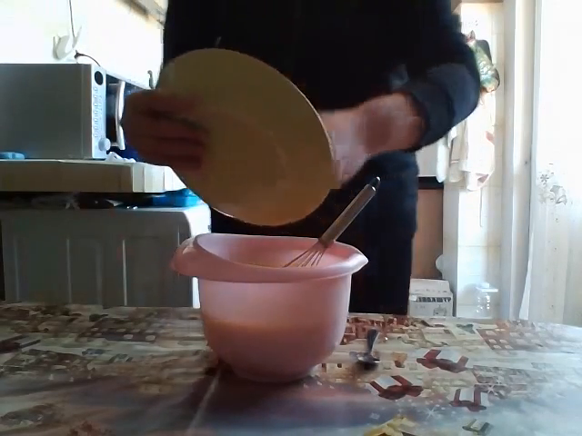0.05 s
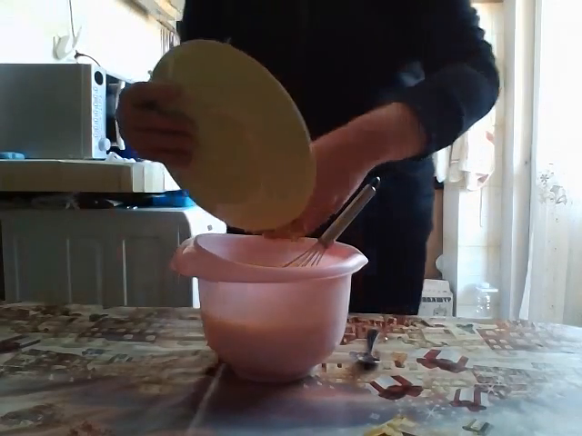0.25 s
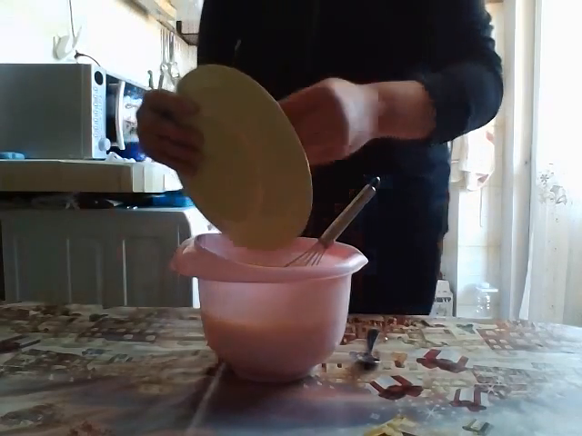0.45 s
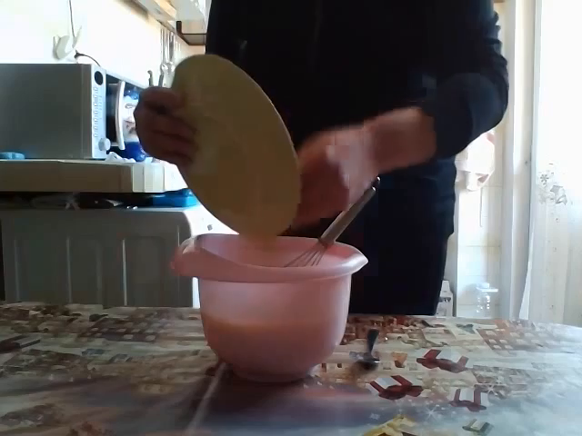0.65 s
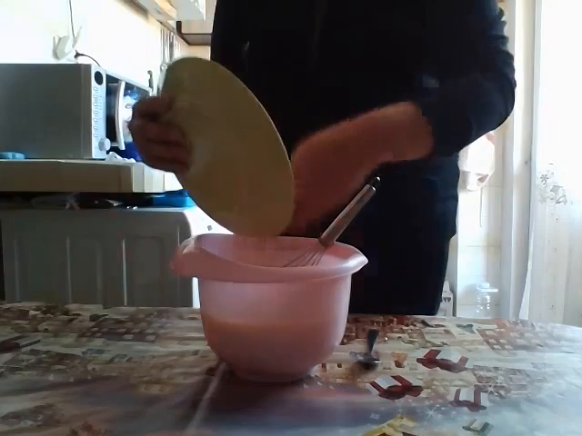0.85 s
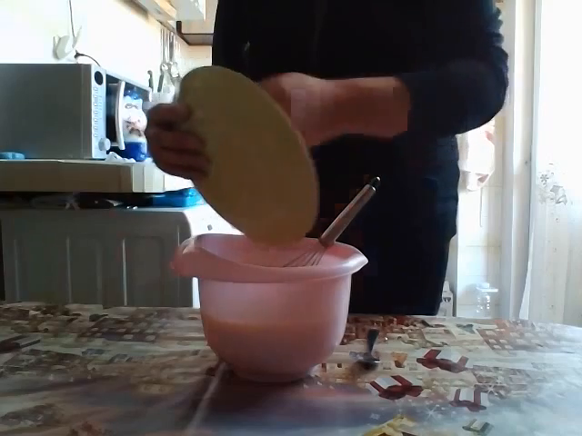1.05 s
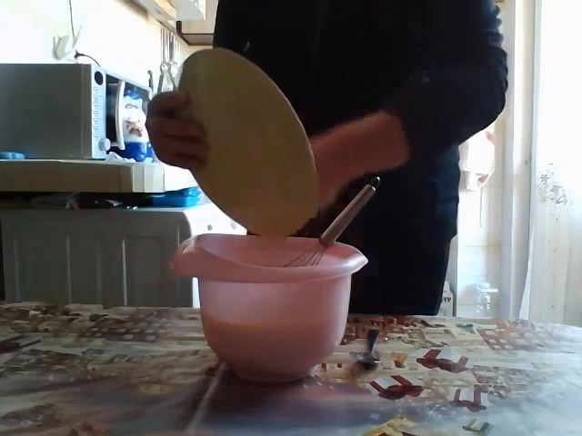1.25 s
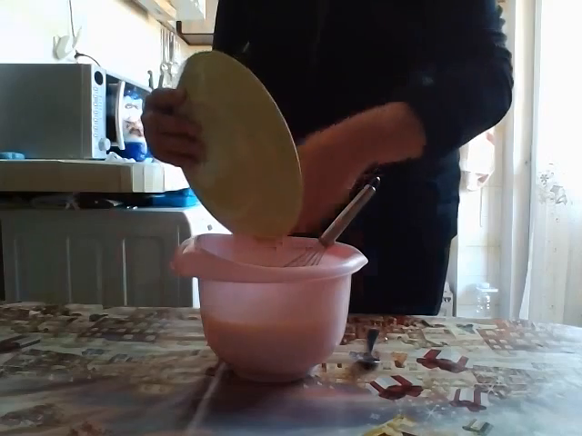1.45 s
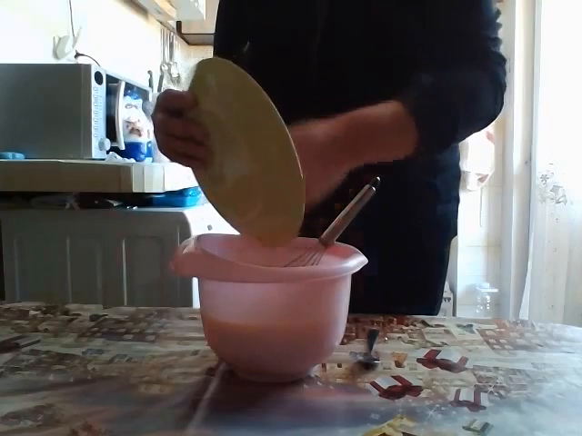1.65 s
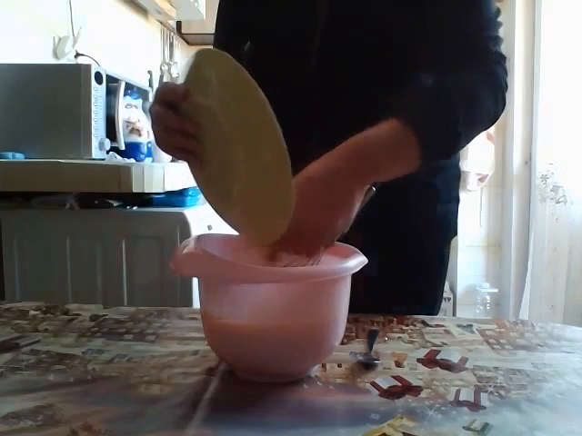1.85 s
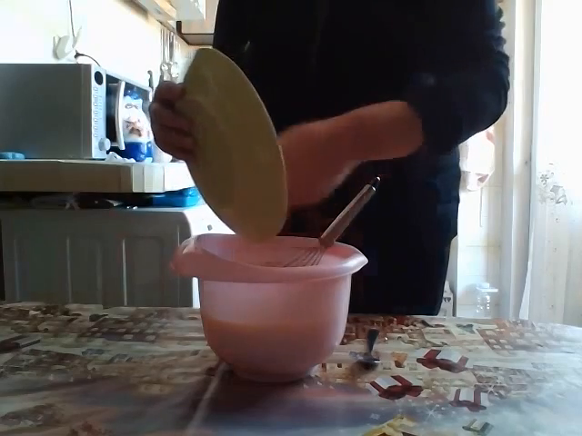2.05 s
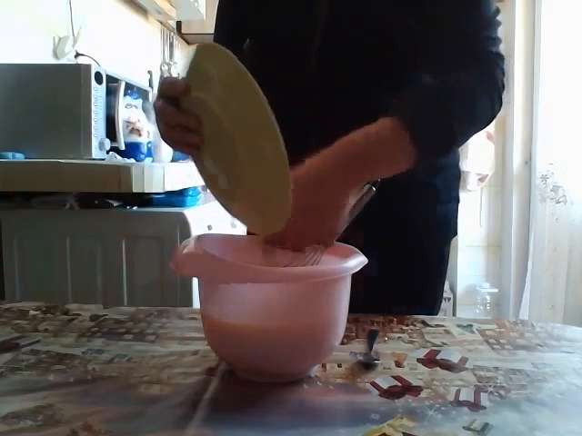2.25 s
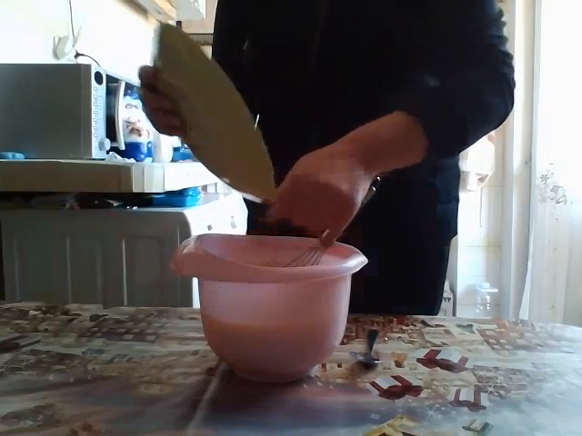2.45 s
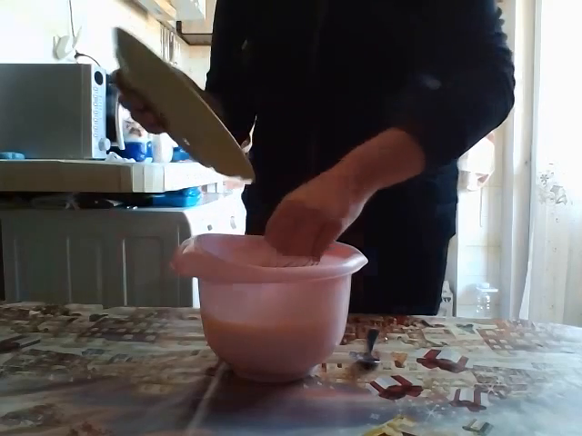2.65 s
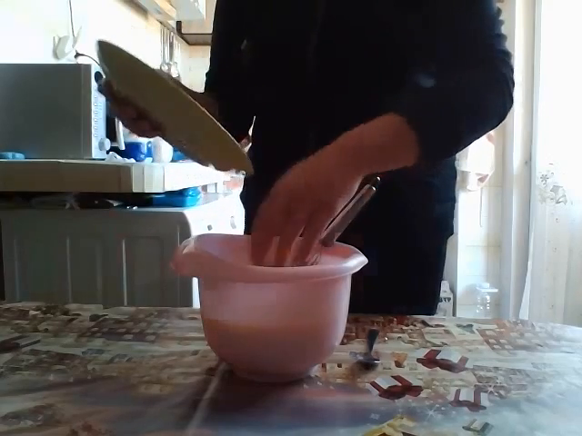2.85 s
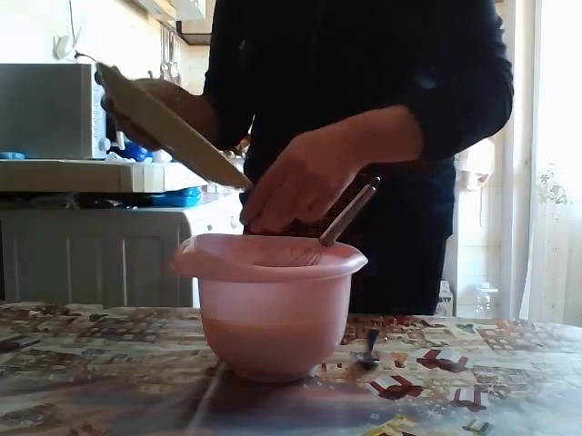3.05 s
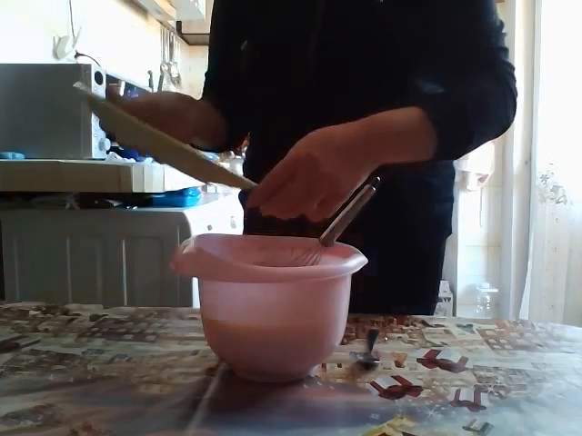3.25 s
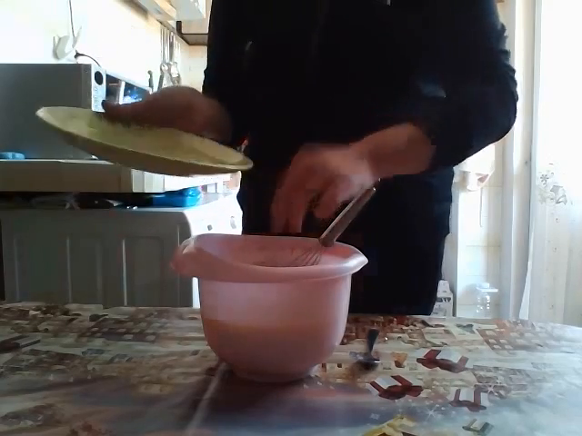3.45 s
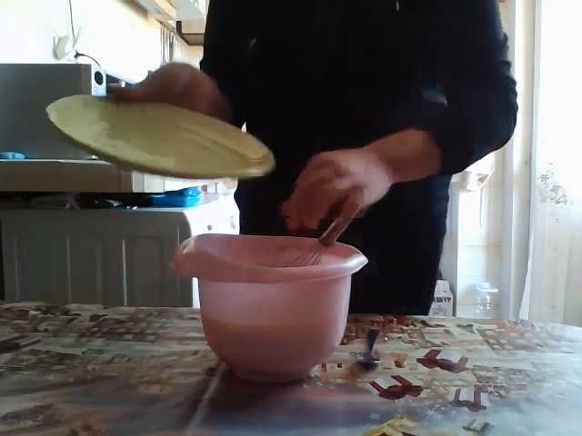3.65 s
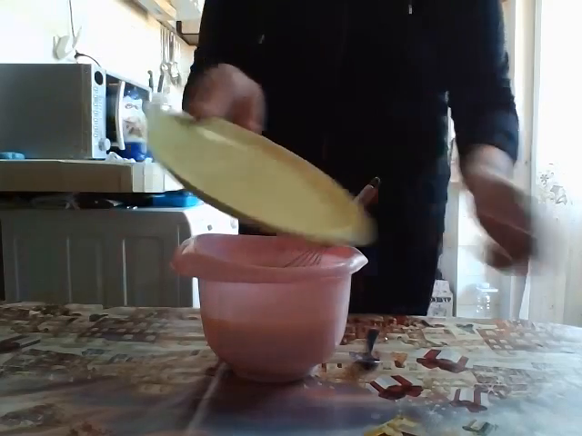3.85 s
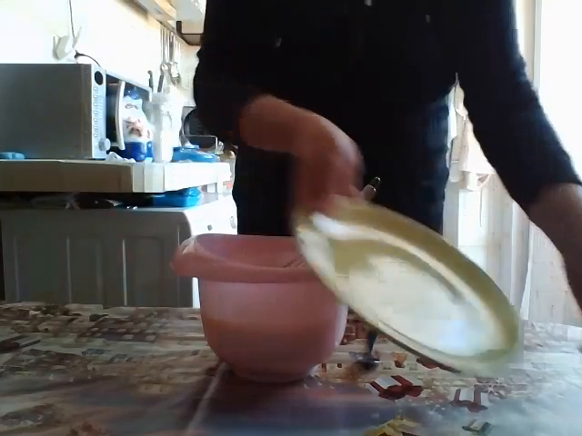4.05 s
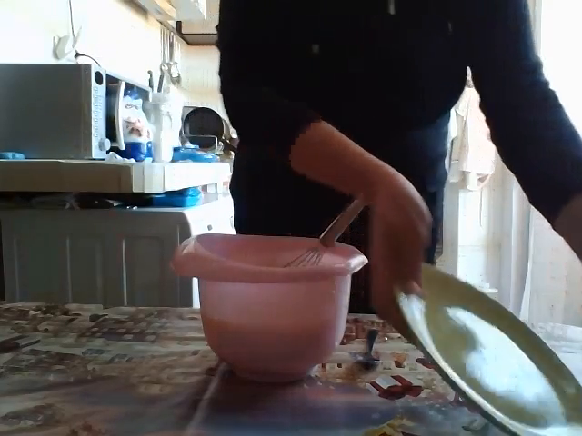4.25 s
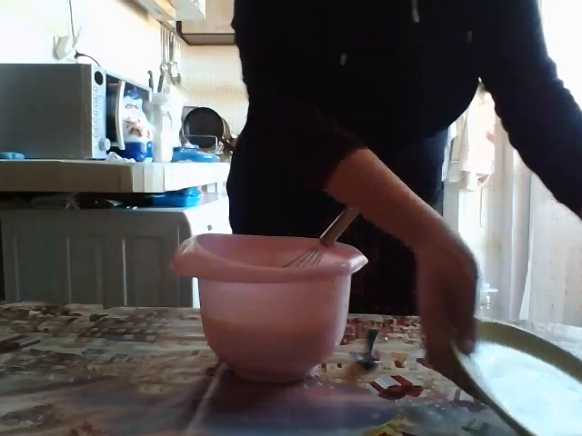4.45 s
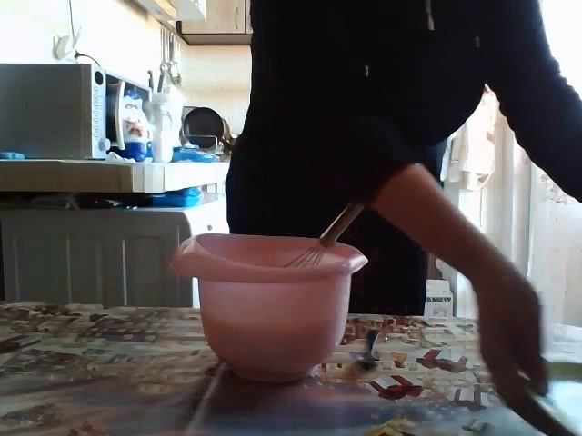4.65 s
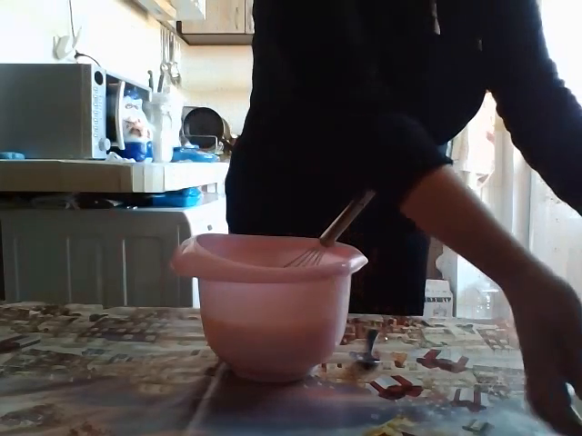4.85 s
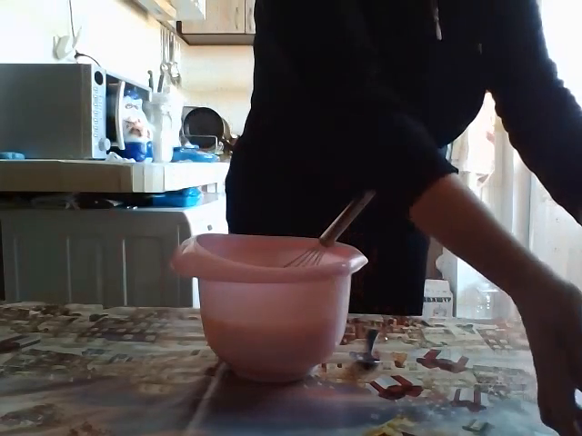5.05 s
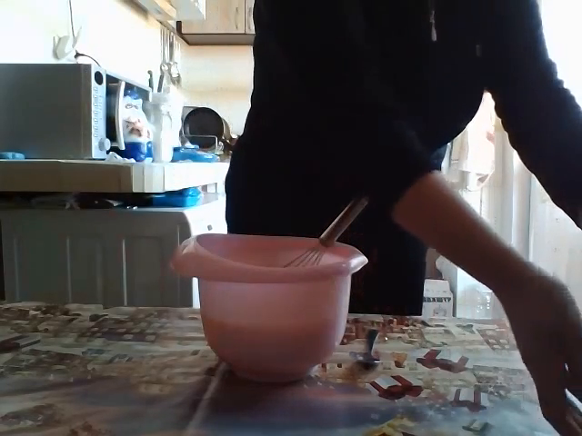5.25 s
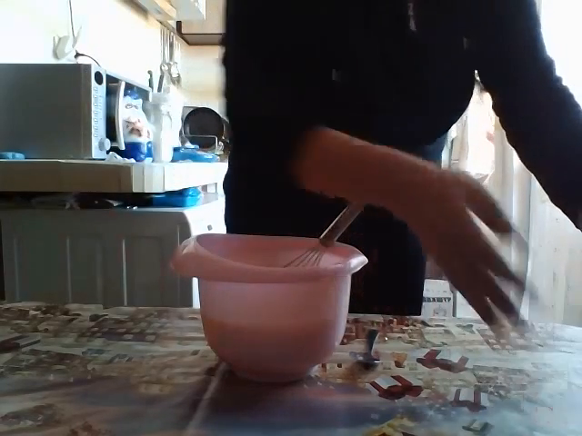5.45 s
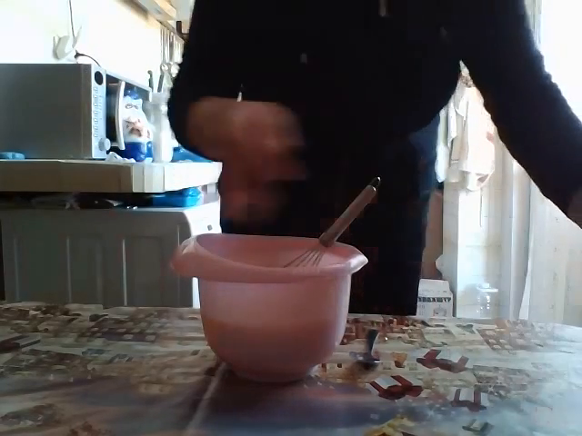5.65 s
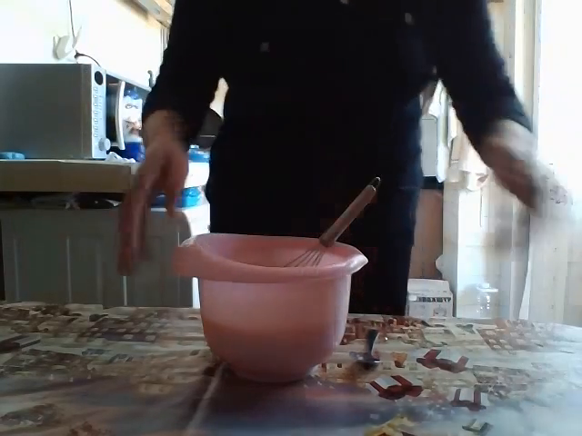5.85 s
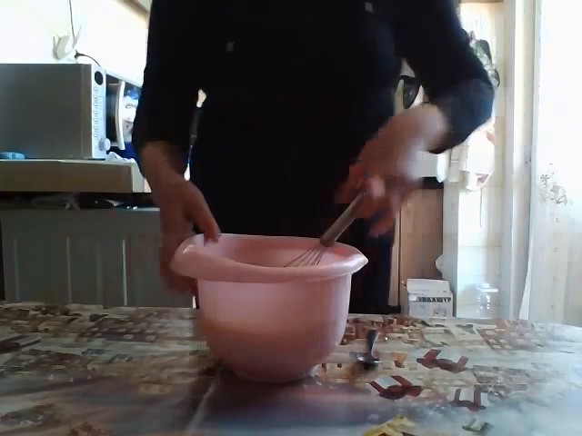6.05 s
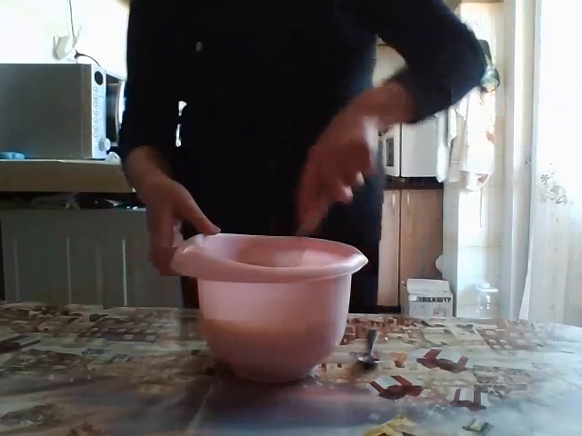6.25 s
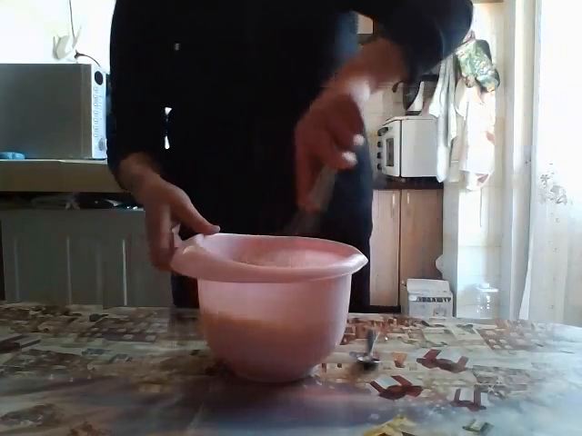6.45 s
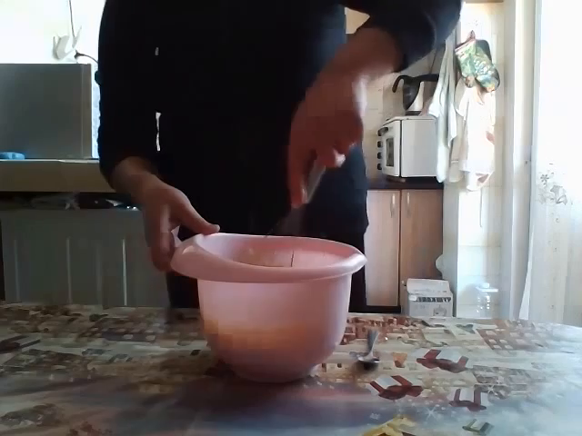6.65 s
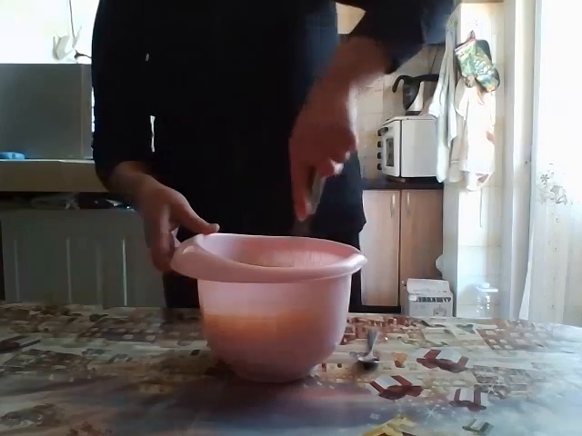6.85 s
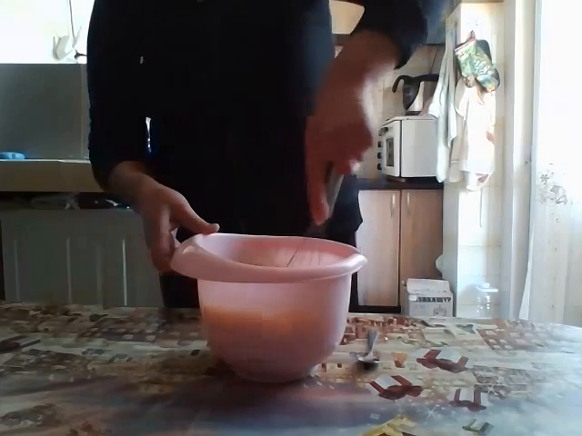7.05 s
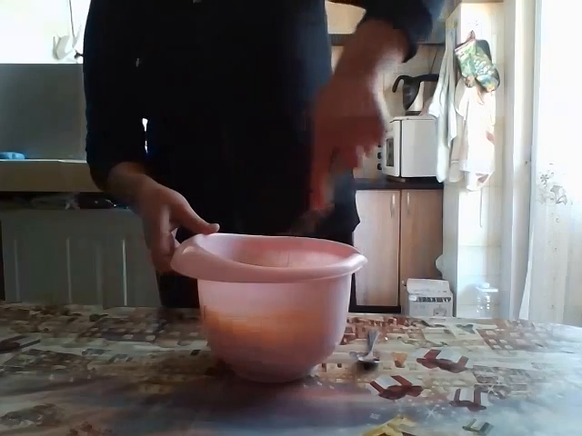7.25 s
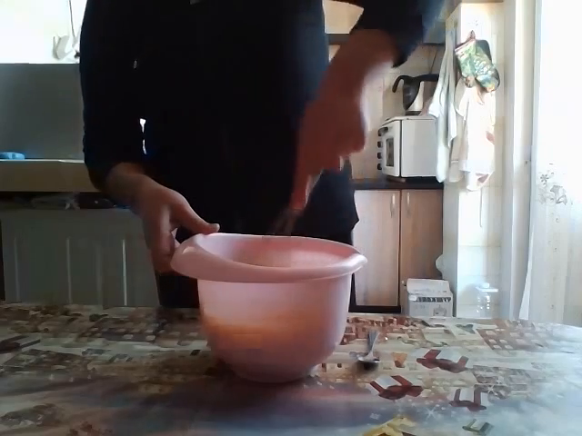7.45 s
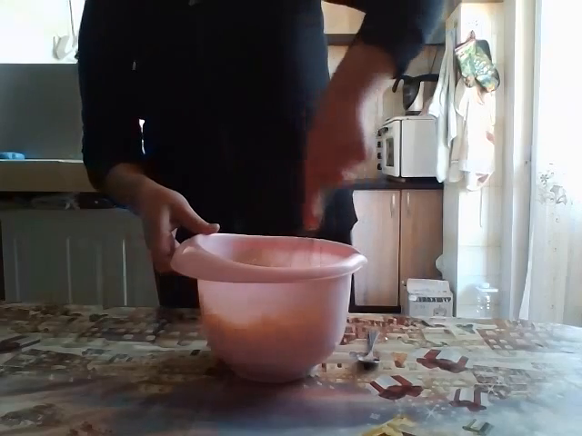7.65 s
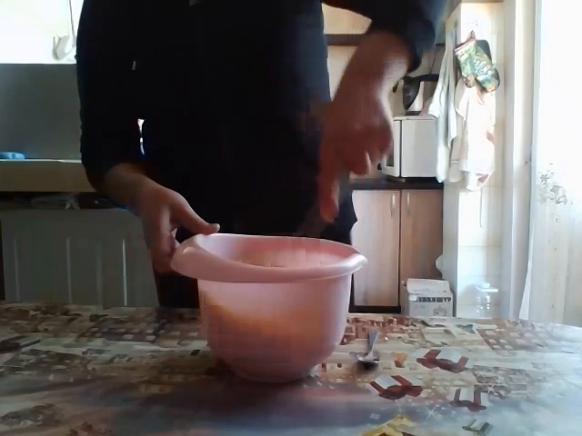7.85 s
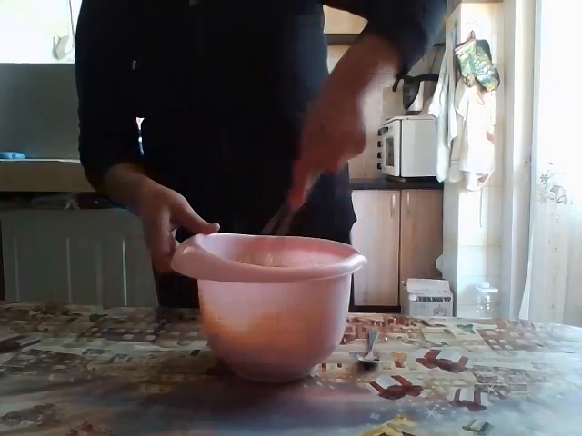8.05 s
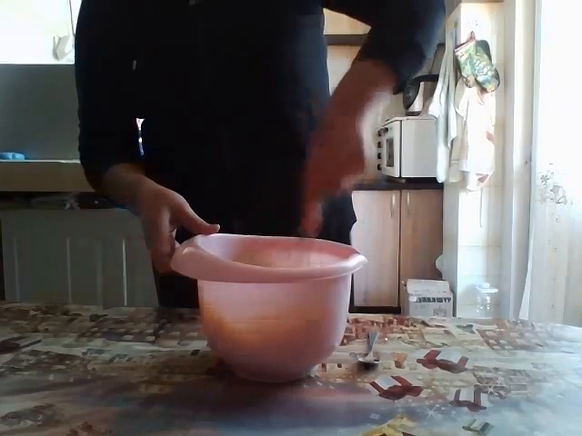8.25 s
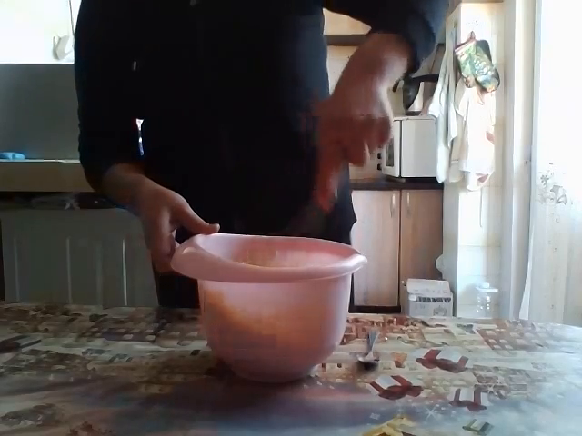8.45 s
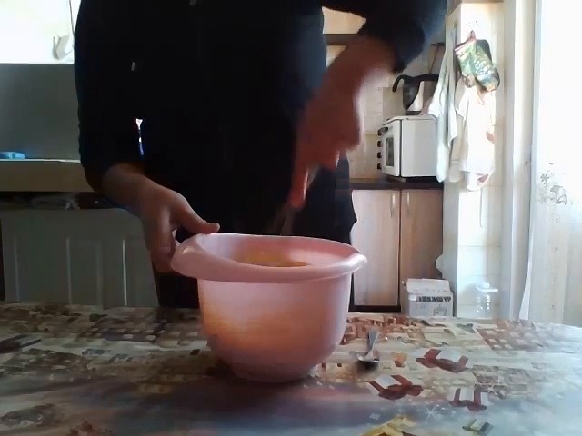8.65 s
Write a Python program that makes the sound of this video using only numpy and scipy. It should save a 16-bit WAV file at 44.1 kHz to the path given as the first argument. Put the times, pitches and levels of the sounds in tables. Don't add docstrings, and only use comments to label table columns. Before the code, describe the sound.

Faint taps on a held china plate, then the plate clatters down on a wooden table, and a whisk scrapes and knocks a plastic bowl.

```python
import sys
import numpy as np
from scipy import signal
from scipy.fft import rfft, irfft, next_fast_len
from scipy.io import wavfile
from scipy.ndimage import uniform_filter1d, minimum_filter1d

SR = 44100
rng = np.random.default_rng(int(sys.argv[2]) if len(sys.argv) > 2 else 0)


def amp(db):
    return 10 ** (np.asarray(db, float) / 20)


def write(x):
    x = np.atleast_2d(x).T
    wavfile.write(sys.argv[1], SR, np.round(np.clip(x, -1, 1) * 32767).astype(np.int16))


N = 384111

# [t/s, peak level/dB, low level/dB, high level/dB, ring f/Hz]
LANDINGS = [(4.362, -5, -8, -19, 1128), (4.378, -15, 0, -17, 339), (4.40, -12.5, -4.5, -23.5, 1300),
            (4.43, -17.5, -3.5, -32.5, 1369), (5.136, -21, 9, -42.5, 758), (5.145, -7, -3.5, -38, 980),
            (5.162, -17, 5, -15, 1062), (5.18, -21, 5.5, -23.5, 502.2), (5.233, 0, -7, -21.5, 720),
            (5.275, -19.5, 5, -29, 1042), (5.431, -8.5, -1.5, -34, 980.4), (5.452, -19.5, 4, -21.5, 601.7),
            (5.495, -28, 3.5, -25, 1042)]
# [t/s, level/dB, weight on the table/dB]
SLIDE = [
    (4.45, -35.5, -10),
    (4.516, -41, 8.5),
    (4.564, -43.5, 19),
    (4.664, -43, 16),
    (4.942, -53.5, 4),
    (5.076, -60.5, 9),
    (5.12, -61, 7),
]
# [f/Hz, width/Hz, level/dB]
WOOD_AND_PLATE = [(491, 81, -2.5), (704, 73, -0.5), (796, 180, -2), (1066, 65, 0), (1115, 40, -0.5),
                  (1410, 210, -7.5), (1690, 180, -9.5), (1953, 220, -16.5)]
# [f/Hz, level per Hz/dB]
CRACK = [(1300, -35.5), (2000, 1.5), (2400, -7.5), (3000, -11), (4000, -21.5), (5500, -29), (7000, -37),
         (9000, -58), (13000, -99)]


def plate_on_table():
    landing = blows([(*row, 0.2223) for row in LANDINGS], body_db=-6, ring_db=-10.0, tail_db=-3.5, snap_s=0.0396)
    db, weight_db = curves(SLIDE)
    bright_db = -17.5 - 0.6 * np.maximum(db + 42.0, -15)
    slide = drag(db, weight_db, bright_db, slips=950, spread_db=0.5, press_db=0.5)
    return sounded(landing + slide, WOOD_AND_PLATE, CRACK)


# [t/s, peak level/dB, low level/dB, high level/dB, ring f/Hz]
TAPS = [(0.108, -67.5, 19, 9.5, 940), (0.143, -53, -5, -7, 1706), (0.324, -43.5, -6.5, -22, 1100),
        (0.454, -46, -6, -20.5, 1274), (0.899, -40.5, -32, -7, 1902), (0.912, -31.5, -33.5, -16, 1001),
        (0.961, -44, -25.5, -11, 1100), (0.999, -48.5, -15.5, -26.5, 816), (1.319, -56, -9.5, -13, 1743),
        (2.232, -43, -6, -17.5, 893.4), (2.248, -45, -16.5, -29, 894), (2.369, -44.5, -18, -13, 857),
        (2.507, -44, -8.5, -29, 1263), (2.533, -43.5, -11.5, -31.5, 857), (2.795, -60.5, 15, -14, 1028),
        (2.858, -49.5, -16, -22, 1277), (2.951, -54, 0, -20, 1969), (3.297, -52, 0.5, -18.5, 2197),
        (3.33, -57.5, -7.5, -21, 902), (3.998, -49, 13, -28.5, 761), (4.189, -56, 6, -37.5, 1660)]
# [f/Hz, width/Hz, level/dB]
HELD_PLATE = [(770, 150, -7.5), (980, 150, -2), (1300, 350, -2), (1660, 200, -1), (2023, 116, -4.5)]


def finger_taps():
    taps = blows([(*row, 0.15) for row in TAPS], body_db=-5, ring_db=-2, tail_db=-2.0, snap_s=0.024)
    return sounded(taps, HELD_PLATE, CRACK)


# [f/Hz, level/dB, t60/s]
CHINA = [
    [(760, -3, 0.3), (795, -1, 0.4)],
    [(1710.3, -1.5, 0.21), (1767, -2, 0.243)],
    [(2684, -9.5, 0.13), (2896.6, -2, 0.16), (2949, -7, 0.21)],
    [(3766, 0.5, 0.059), (4369, -0.5, 0.13), (5164, -10, 0.16), (6419, -8, 0.1)],
]
# [t/s, then level/dB of each of the four families]
CLINKS = [(.064, -72, -71, -53.5, -78), (.12, -79, -63, -53.5, -67), (.176, -73.5, -61, -52, -79.5),
          (.469, -67, -63, -58.5, -78), (1.294, -67, -59, -53, -83.5), (2.174, -65, -55, -47.5, -68.5),
          (2.346, -51, -49, -43.5, -51), (3.99, -47.5, -57, -60.5, -81),
          (4.009, -40.5, -48.5, -61.5, -84.5), (4.924, -59, -56, -75, -68),
          (4.949, -59.5, -49.5, -77.5, -73.5), (5.234, -29.5, -7, -26, -40)]


def china_ring():
    out, t = np.zeros(N + SR), np.arange(SR // 2) / SR
    grip = wobble(80)
    drift = np.cumsum(17 * grip) / SR
    for s, *family_db in CLINKS:
        start = round(s * SR)
        life = 0.65 if s < 3 else 1
        for db, modes in zip(family_db, CHINA):
            ring = 0
            for hz, level, t60 in modes:
                waver_db = 2.9 * np.roll(grip, round(9 * hz))[start:][:len(t)]
                bend = np.roll(drift, round(hz))[start:][:len(t)]
                tone = np.sin(2 * np.pi * (hz * t + bend + rng.random()))
                ring = ring + amp(level - 60 * t / (t60 * life) + waver_db) * tone
            out[start:][:len(t)] += amp(db) * ring * (1 - np.exp(-t / 0.00047)) ** 2
    return out[:N]


# [t/s, level/dB, upper mode level/dB]
RUBS = [
    [(1.2, -99.5, -31.5), (1.29, -51.5, -17), (1.35, -95, -30)],
    [(4.45, -80.5, -27.5), (4.56, -66.5, -11), (4.63, -61, -5), (4.78, -65, -9), (4.9, -74.5, -1.5),
     (5.0, -85.5, -10)],
]
# [f/Hz, width/Hz, level/dB]
SONG = [
    [(2874.4, 42, -0.5)],
    [(4360, 70, 0), (4700, 500, -12)],
]


def china_rub():
    rubs = [curves(rows) for rows in RUBS]
    low = sum(amp(db) for db, upper_db in rubs) * rng.standard_normal(N)
    high = sum(amp(db + upper_db) for db, upper_db in rubs) * rng.standard_normal(N)
    return filtered(low, body(SONG[0])) + filtered(high, body(SONG[1]))


# [t/s, peak level/dB, wires level/dB, ring f/Hz]
SHOVES = [(6.036, -48, 5.5, 434), (6.452, -39, -11.5, 784), (6.838, -19.5, -36, 516),
          (6.899, -25.5, -26.5, 536), (7.104, -30, -29.5, 530.6), (7.12, -20.5, -25.5, 427.2),
          (7.144, -19.5, -38.5, 501.7), (7.369, -26.5, -36.5, 779.5), (7.409, -26.5, -28.5, 1175),
          (7.429, -27.5, -38, 713), (8.598, -23.5, -22, 491)]
# [t/s, peak level/dB, wires level/dB, ring f/Hz]
KNOCKS = [(6.154, -40, -26, 1137), (6.344, -27.5, -24.5, 1173), (6.543, -24, -34.5, 521),
          (6.566, -18, -36, 695), (6.868, -20, -27, 796), (7.03, -54, -6, 2500), (7.354, -34.5, -17, 421),
          (7.383, -28, -26, 791.3), (7.648, -37.5, -32, 467), (7.746, -33.5, -14.5, 1126),
          (7.937, -17, -36, 1103), (7.96, -32.5, -19.5, 1162), (8.012, -13, -38, 755.3),
          (8.045, -32.5, -36.5, 770), (8.231, -17, -40, 1064), (8.268, -23, -33.5, 1139),
          (8.292, -17, -32, 455.3), (8.342, -28.5, -29, 773), (8.547, -20, -40.5, 411.5),
          (8.581, -18, -36, 1100)]
# [t/s, peak level/dB, wires level/dB, ring f/Hz]
TICKS = [(6.206, -40.5, 3.5, 3270), (6.248, -45.5, 2, 1100), (6.319, -15, -15, 804.6),
         (6.375, -28, -25.5, 1146), (6.405, -40.5, -3, 1848), (6.488, -48, -8, 3316),
         (7.593, -34, -12, 1150), (7.662, -24.5, -36.5, 465.3), (7.77, -45.5, -17.5, 1115),
         (7.871, -19, -17, 1161), (7.881, -30, -4, 1400), (8.083, -36, -36, 733), (8.125, -39, -25.5, 700),
         (8.162, -22, -15.5, 1107), (8.427, -47, -16.5, 1500), (8.441, -36.5, -16, 1184),
         (8.459, -43.5, -5, 6160), (8.461, -28, -4.5, 1063), (8.625, -22.5, -11, 685)]
# [level into the table/dB, t60/s]
CONTACTS = [
    (1, 0.079),
    (-11, 0.109),
    (-24.5, 0.123),
]
# [f/Hz, width/Hz, level/dB]
BOWL = [(448.4, 82, -6), (747, 65.2, -0.5), (921.7, 45, -3.5), (1100, 94, 0), (1434, 100.3, -2.5),
        (1614, 196, -10), (2054, 322, -16.5)]
# [f/Hz, level per Hz/dB]
WIRES = [(1400, -16), (2300, 4), (2900, -3), (3200, -5.5), (3500, -4.5), (3900, -11.5), (4300, -10),
         (5000, -23), (5500, -17), (5900, -26), (6500, -17.5), (7200, -26), (9500, -35.5), (14000, -85.5)]


def whisk():
    hits = []
    for rows, (low_db, t60) in zip([SHOVES, KNOCKS, TICKS], CONTACTS):
        hits += [(s, db, low_db, wires_db, hz, t60) for s, db, wires_db, hz in rows]
    knocks = blows(sorted(hits), body_db=-9, ring_db=0.5, tail_db=-7.5, snap_s=0.02155)
    db, wires_db = strokes()
    scrape = drag(db, 0.16 + 0 * db, wires_db, slips=1400, spread_db=3.2, press_db=-6)
    force = knocks + scrape
    shift = 0.0577
    slack_bowl = [(hz * (1 - shift), width, g) for hz, width, g in BOWL]
    squeezed_bowl = [(hz * (1 + shift), width, g) for hz, width, g in BOWL]
    turn = np.pi / 4 * (1 + np.tanh(2.11 * wobble(14)))
    squeezed = filtered(force[1] * np.sin(turn), body(squeezed_bowl))
    rattle = amp(2.77 * wobble(25))
    force = force * np.array([1 + 0 * turn, np.cos(turn), rattle, 1 + 0 * turn])
    return sounded(force, slack_bowl, WIRES) + squeezed


# [full pressure t/s, level/dB, 60 dB rise/s, 60 dB fall/s, wires level/dB]
STROKES = [(5.77, -53, 0, 0.26, -18.5), (6.03, -55, .05, .3, 5), (6.21, -53.5, 0.0864, 0.77, 5),
           (6.326, -33, 0.133, 0.5, -13), (6.557, -25.5, 0.092, 0.2383, -23.5),
           (6.854, -24.5, 0.0709, 0.17, -16.5), (7.13, -27, 0.0859, 0.1575, -19.5),
           (7.426, -33.5, 0.1971, 0.1376, -17.5), (7.668, -30, 0.0743, 0.2858, -15.5),
           (7.88, -32.5, 0.05, 0.4963, -8.5), (7.94, -23.5, 0.0234, 0.1, -18.5),
           (7.965, -30, .03, .25, -15), (8.02, -27, 0.1026, 0.25, -23), (8.17, -39, .01, .3, -13),
           (8.24, -32, .03, .4, -21), (8.3, -29, 0.3675, 0.1349, -15), (8.465, -38, .015, .5, -4),
           (8.56, -31, .03, .5, -14), (8.61, -31, 0.3, .6, -10)]


def strokes():
    s, db, rise, fall, wires_db = np.transpose(STROKES)[:, :, None]
    late = np.arange(N) / SR - s
    hold_s = 0.01374
    level_db = db - 60 * np.where(late < 0, -late / rise, np.maximum(late - hold_s, 0) / fall)
    return np.maximum(level_db.max(0), -120), wires_db[level_db.argmax(0), 0]


# [t/s, level/dB, f/Hz, t60/s]
RINGS = [(4.361, -1, 300, .04), (4.365, -14, 289.8, .25), (4.361, -15.5, 497.7, 0.196),
         (4.363, -20.5, 990.6, 0.172), (4.363, -27, 1400, .25), (4.363, -24, 1978, 0.126),
         (4.38, -31, 2248, 0.181), (5.146, -7.5, 293.8, 0.147), (5.145, -3, 940, .05),
         (5.234, -15, 1008, 0.36), (5.234, -19, 1102, 0.29), (5.234, -25.5, 1435, .35),
         (5.234, -33, 2222, 0.183), (5.432, -14, 420, 0.185), (5.432, -19, 654, 0.214),
         (5.431, -7, 960, .04), (5.44, -25, 1060, 0.223), (5.432, -23.5, 822, 0.31), (5.435, -33, 1988, .3),
         (6.32, -25.5, 1119, 0.175), (6.567, -26, 1100, 0.091), (6.867, -29, 1137, 0.097),
         (7.144, -28.5, 792.7, 0.107), (7.938, -20, 723, 0.1025), (8.03, -28, 749.1, .3),
         (8.014, -28, 478.6, 0.19), (7.871, -33, 3500, .04), (7.881, -34, 2550, .04),
         (8.23, -25.5, 468.3, 0.135), (8.23, -32.5, 1100, 0.2), (8.295, -31, 781.2, 0.163),
         (8.295, -29, 1482, 0.0685), (8.461, -33, 1100, .2), (8.461, -33, 1437, .04),
         (8.6, -30, 727.3, 0.107)]


def rings():
    out, t = np.zeros(N + SR), np.arange(SR // 3) / SR
    for (s, db, hz, t60), knots in zip(RINGS, rng.standard_normal((len(RINGS), 2, 40))):
        level, bend = [np.interp(t * 115, np.arange(40), k) for k in knots]
        tone = np.sin(2 * np.pi * (hz * t + np.cumsum(28 * bend) / SR))
        decay = amp(db + 3.5 * level - 60 * t / t60)
        out[round(s * SR):][:len(t)] += decay * (1 - np.exp(-t / 0.0013)) * tone
    return out[:N]


# [t/s, peak level/dB, f/Hz]
JOLTS = [(0.109, -44.5, 42.8), (0.622, -43, 83), (1.6, -42, 45.8), (2.775, -34, 41.3), (2.794, -34, 71.6),
         (3.995, -29, 93.7), (4.217, -35.5, 45.7), (4.359, -17, 135), (4.37, -24, 40), (4.52, -27, 90),
         (5.149, -11.5, 117.2), (5.16, -20, 42), (5.25, -22, 45), (5.232, -13.5, 73.6), (5.432, -13, 67.2),
         (5.987, -29, 71.8), (6.216, -28, 51.9), (6.557, -25, 68.3), (6.843, -23, 95.5), (7.109, -31, 62),
         (7.372, -26.5, 59.3), (7.669, -38, 88.4), (7.889, -24.5, 77.3), (7.949, -24.5, 49.9),
         (8.02, -37, 146.2), (8.269, -29.5, 86.9), (8.478, -30, 85), (8.618, -20, 51.16),
         (8.671, -28.5, 50.8)]


def jolts():
    out, t = np.zeros(N + SR), np.arange(SR // 3) / SR
    for s, db, hz in JOLTS:
        decay = amp(db - 60 * t / 0.22)
        out[round(s * SR):][:len(t)] += decay * (1 - np.exp(-t / 0.0035)) ** 2 * np.sin(2 * np.pi * hz * t)
    return out[:N]


# [f/Hz, t60/s]
KITCHEN = [
    (150, 0.3485),
    (1000, 0.296),
    (4000, 0.48),
    (10000, .2),
]


def kitchen(x):
    hz, t, z = signal.stft(rng.standard_normal(SR // 2), SR, nperseg=256)
    decay = amp(-60 * t / along(KITCHEN, hz)[:, None])
    tail = signal.istft(z * decay, SR, nperseg=256)[1]
    delayed = np.pad(x, (300, 0))
    return signal.fftconvolve(delayed, tail / np.linalg.norm(tail))[:N]


# [t/s, sway level/dB]
LEANING = [(0.0, -64), (0.09, -52), (0.36, -44), (1.26, -45), (1.72, -60), (2.76, -52), (3.39, -42),
           (4.32, -43), (4.62, -37), (4.75, -50), (5.1, -43), (5.5, -41), (5.89, -65), (5.97, -44.5),
           (6.4, -38.5), (6.5, -48), (8.71, -50.5)]
# [f/Hz, width/Hz, level/dB]
LEGS = [
    (50, 10, 1),
    (34.7, 22, -11),
]
# [f/Hz, level per Hz/dB]
RUMBLE = [(41, -28), (70, -5), (103, -12), (145, -15.5), (265, -9.5), (539, -35), (600, -43), (780, -68.5),
          (1320, -120)]


def sway_and_rumble():
    top_db = -40.5
    sway_db = np.minimum(np.maximum(curves(LEANING)[0], strokes()[0] + 3), top_db)
    rocking = amp(3.3 * wobble(12)) * filtered(rng.standard_normal(N), body(LEGS))
    rumble_db = -58 + 0.562 * (sway_db - top_db) + 2.5 + 1.7 * wobble(20)
    rumble = amp(rumble_db) * filtered(rng.standard_normal(N), colour(RUMBLE))
    return amp(sway_db) * unit(rocking) + rumble


# [f/Hz, level per Hz/dB]
FRIDGE_AIR = [(200, -31), (310, 1), (440, -4.5), (560, -10.5), (790, -6), (900, -4.5), (980, -4.5),
              (1080, -3.5), (1300, -10), (1600, -15.5), (2000, -16.5), (2400, -25), (3200, -40.5),
              (5000, -89.5)]
# [f/Hz, level/dB]
FRIDGE_HUM = [(441.4, -79.5), (689.1, -82.5), (899.0, -75), (1077, -76.5), (1432, -81.5), (1615, -84)]


def fridge():
    air = amp(-65.5 + 1.2 * wobble(1.7)) * filtered(rng.standard_normal(N), colour(FRIDGE_AIR))
    t, hum = np.arange(N) / SR, 0
    for hz, db in FRIDGE_HUM:
        level = amp(db + 6 + 3 * wobble(6.9))
        hum = hum + level * np.sin(2 * np.pi * hz * t + 2.2 * wobble(14))
    return air + hum


# [f/Hz, level per Hz/dB]
HISS = [(500, -18), (1500, 7), (2500, 0.5), (4000, -1), (6300, -2), (8000, -3), (10000, -7), (13000, -16.5),
        (15500, -22.5), (17000, -59.5)]


def hiss():
    return amp(-69.5) * mottled(filtered(rng.standard_normal(N), colour(HISS)), patchy_db=1.47)


def mottled(x, patchy_db):
    z = signal.stft(x, nperseg=512)[2]
    field = uniform_filter1d(rng.standard_normal(z.shape), size=7, axis=0)
    field = uniform_filter1d(field, size=14, axis=1)
    return signal.istft(z * amp(patchy_db * unit(field)), nperseg=512)[1][:N]


def blows(events, body_db, ring_db, tail_db, snap_s):
    force, t = np.zeros((4, N + SR)), np.arange(SR // 4) / SR
    for s, db, low_db, high_db, hz, t60 in events:
        start = round(s * SR)
        life = t60 * np.c_[[1, 1, 0.6]]
        tail = amp(tail_db - 60 * t / life) * (1 - np.exp(-t / 0.0057))
        shape = amp(-60 * t / snap_s) + tail
        first = np.exp(-t / 0.000077) * 3
        push = shape * rng.standard_normal((3, len(t))) + first * np.c_[[1, 1, .4]]
        force[:3, start:][:, :len(t)] += amp(db + np.c_[[low_db, body_db, high_db - 2.5]]) * push
        flutter = np.interp(t * 130, np.arange(40), rng.standard_normal(40))
        t60 = t60 * min(1, 1400 / hz)
        decay = amp(-60 * t / (0.51 * t60)) + 0.31 * flutter * amp(-60 * t / (1.6 * t60))
        ring = decay * np.sin(2 * np.pi * hz * t)
        force[3, start:][:len(t)] += amp(db + ring_db) * (1 - np.exp(-t / 0.0011)) ** 2 * ring
    return force[:, :N]


def drag(db, low_db, high_db, slips, spread_db, press_db):
    slip = (rng.random(N) < slips / SR) * amp(spread_db * np.minimum(rng.exponential(size=N), 2.5))
    smooth = np.sqrt(abs(uniform_filter1d(slip ** 2, size=60)))
    grip = unit(smooth + 0.37 * np.std(slip))
    parts_db = np.array([low_db, 0 * db, high_db, db - 99])
    return amp(db + press_db + parts_db) * grip * rng.standard_normal((4, N))


# [f/Hz, width/Hz, level/dB]
TABLE_TOP = [(93.6, 33, -5.5), (150.2, 13, -4), (194.2, 16.9, 4), (260.8, 22, -4), (295.2, 30.4, -2.5),
             (400.4, 39, -7.5)]


def sounded(force, middle, edge):
    low = filtered(force[0], body(TABLE_TOP))
    return low + filtered(force[1], body(middle)) + filtered(force[2], causal(edge)) + force[3]


def body(peaks):
    def response(f):
        modes = 0
        for k, (hz, width, db) in enumerate(peaks):
            modes = modes + (-1) ** k * amp(db) * 1j * f * width / (hz * hz - f * f + 1j * f * width)
        return modes / (1 + 1j * f / (1.331 * peaks[-1][0])) ** 4
    return response


def colour(points):
    return lambda f: amp(along(points, f))


def causal(points):
    def response(f):
        cepstrum = irfft(np.log(amp(along(points, f)) + 1e-6))
        cepstrum[1:len(f) - 1] *= 2
        cepstrum[len(f):] = 0
        return np.exp(rfft(cepstrum))[:len(f)]
    return response


def filtered(x, response):
    m = next_fast_len(N + SR // 4, True)
    gain = response(np.fft.rfftfreq(m, 1 / SR))
    return irfft(rfft(x, m) * gain / np.sqrt(np.mean(abs(gain) ** 2)), m)[:N]


def unit(x):
    return x / np.sqrt(np.mean(x ** 2) + 1e-20)


def along(points, hz):
    f, v = np.transpose(points)
    return np.interp(np.log(hz + 1), np.log(f + 1), v)


def curves(rows):
    s, *cols = np.transpose(rows)
    return [np.interp(np.arange(N) / SR, s, c, left=-99, right=-99) for c in cols]


def wobble(rate):
    knots = rng.standard_normal(int(N * rate / SR) + 4)
    return np.interp(np.arange(N) * rate / SR, np.arange(len(knots)), knots)


def scene():
    near = plate_on_table() + finger_taps() + china_ring() + china_rub() + whisk() + rings()
    background = sway_and_rumble() + fridge() + hiss()
    return (near + amp(-10.0) * kitchen(near) + jolts() + background)[None]


def band_limit(x):
    return signal.sosfilt(signal.butter(12, 15500, fs=SR, output="sos"), x)


# [t/s, level/dB]
GAIN = [
    (0, 0),
    (4.37, -0.5),
    (4.42, -6),
    (4.53, -4),
    (4.62, -2),
    (5.14, -0.5),
    (5.25, -4.5),
    (5.6, -3.5),
    (5.85, 0),
    (9, 0),
]
LOST = [5, 22, 28, 61, 66, 76, 140, 164, 183, 187, 191, 206, 260, 267, 268, 269, 278, 315, 326, 357, 378,
        588, 664, 775, 840]


def record(dry):
    x = dry * amp(curves(GAIN)[0])
    needed = np.minimum(1, .97 / (abs(x) + 1e-9))
    x = x * uniform_filter1d(minimum_filter1d(needed, size=161), size=161)
    block_s, first_s = .01, .0058
    kept = ~np.isin((np.arange(N) / SR - first_s) // block_s, LOST)
    return band_limit(x * uniform_filter1d(1. * kept, size=14))


dry = scene()
out = record(dry)
write(out)
```